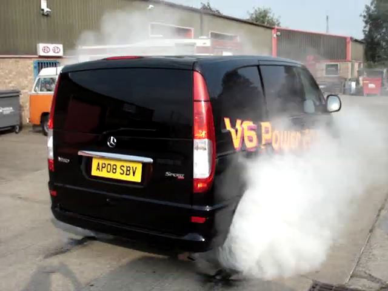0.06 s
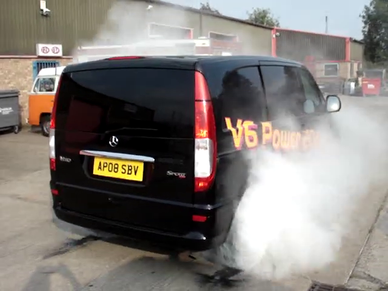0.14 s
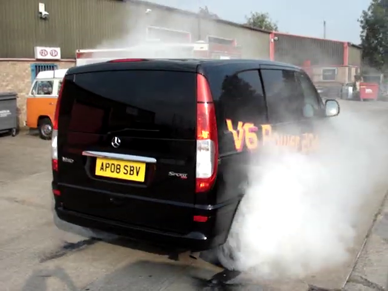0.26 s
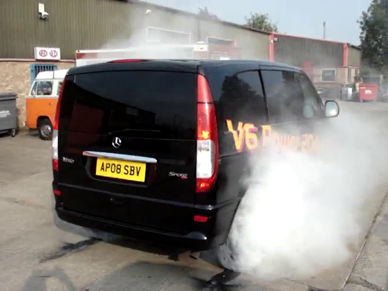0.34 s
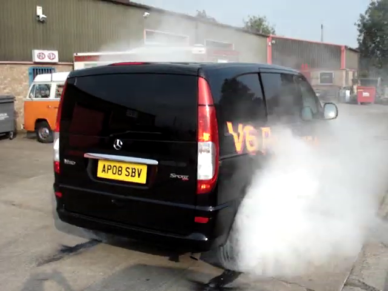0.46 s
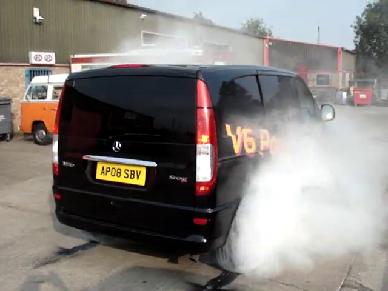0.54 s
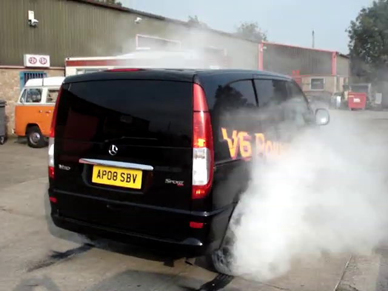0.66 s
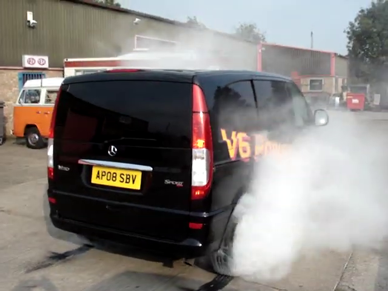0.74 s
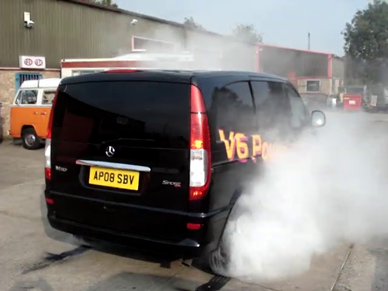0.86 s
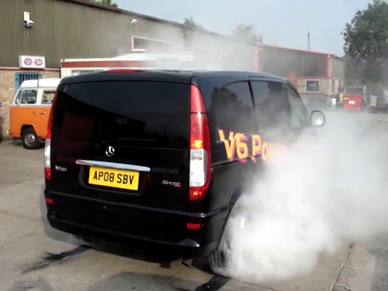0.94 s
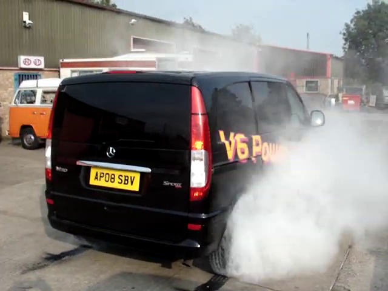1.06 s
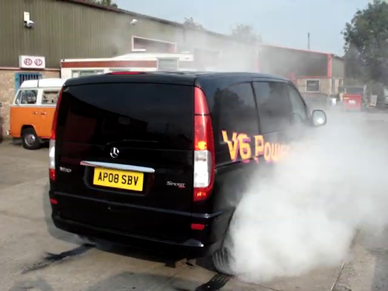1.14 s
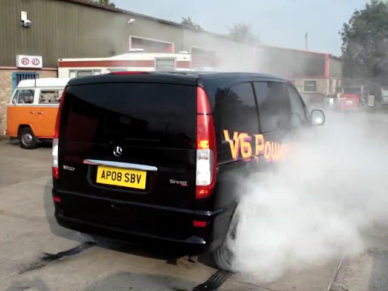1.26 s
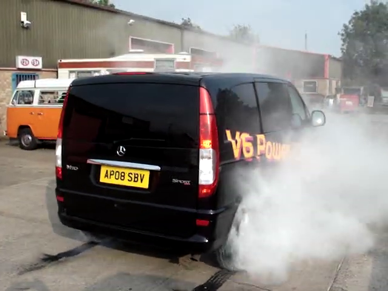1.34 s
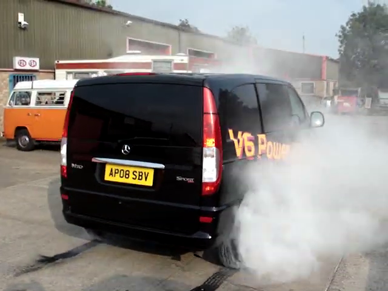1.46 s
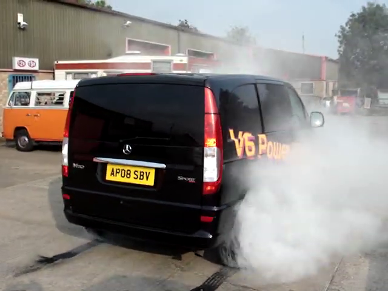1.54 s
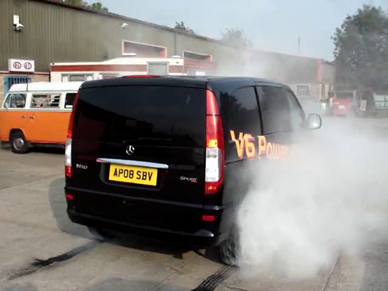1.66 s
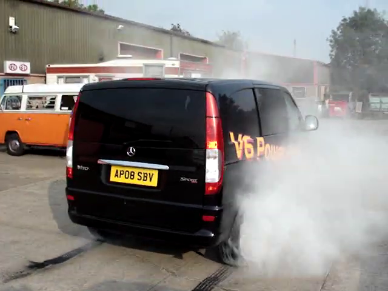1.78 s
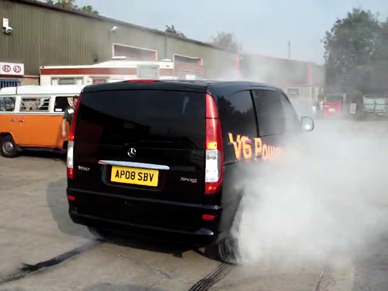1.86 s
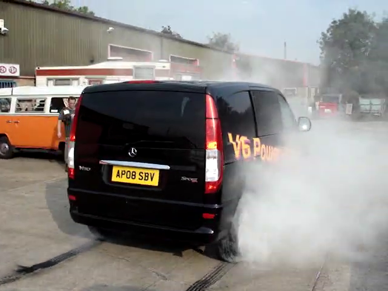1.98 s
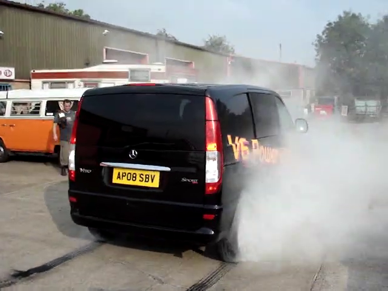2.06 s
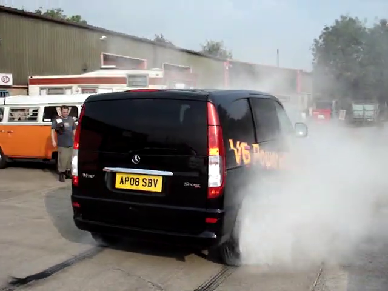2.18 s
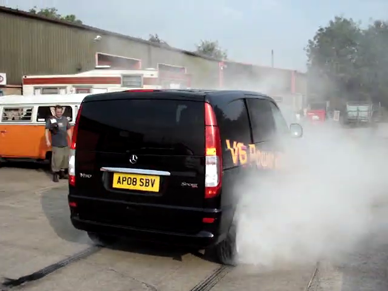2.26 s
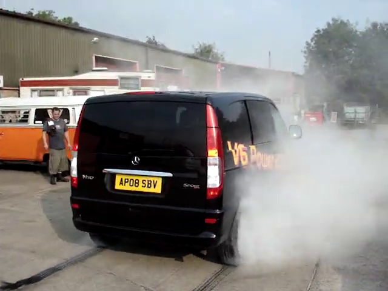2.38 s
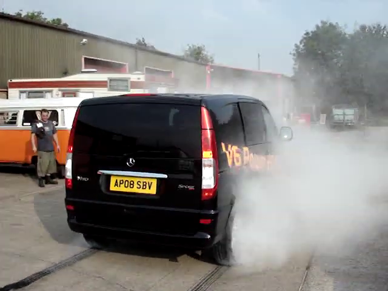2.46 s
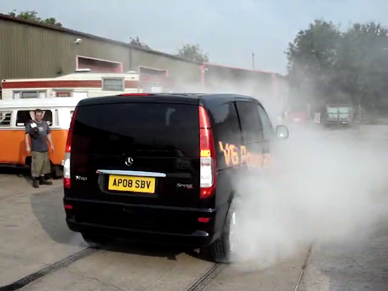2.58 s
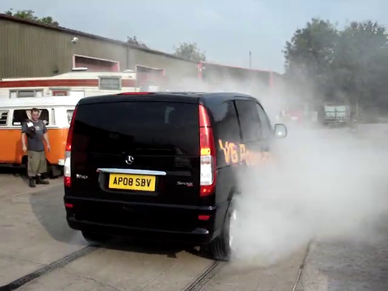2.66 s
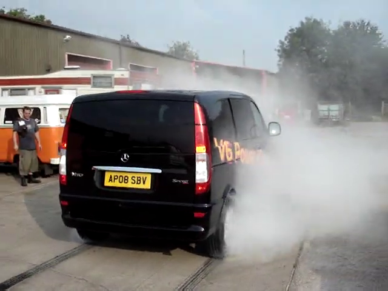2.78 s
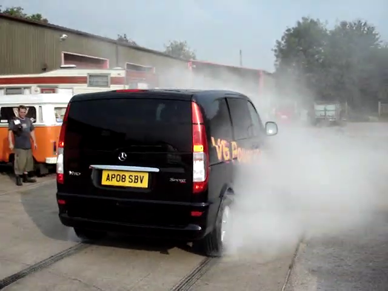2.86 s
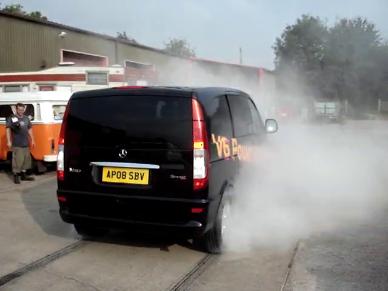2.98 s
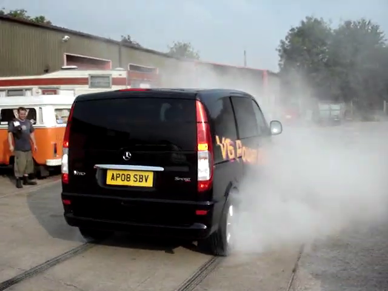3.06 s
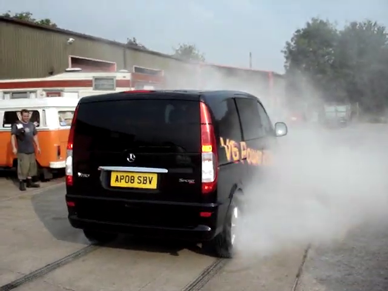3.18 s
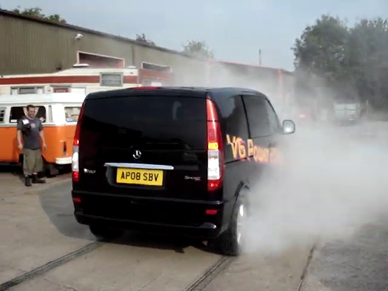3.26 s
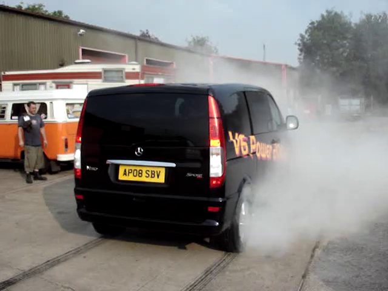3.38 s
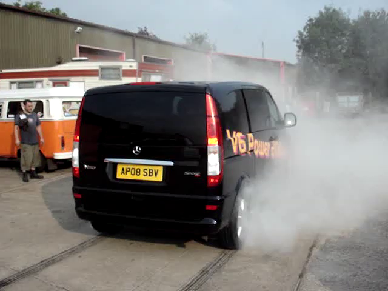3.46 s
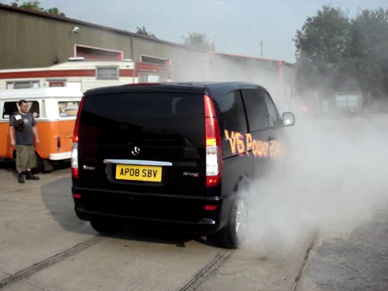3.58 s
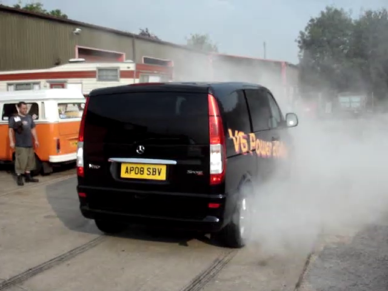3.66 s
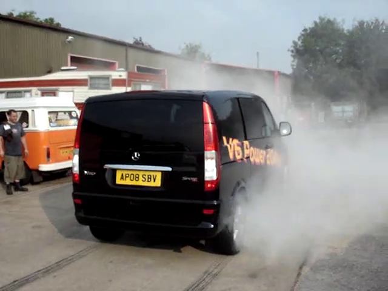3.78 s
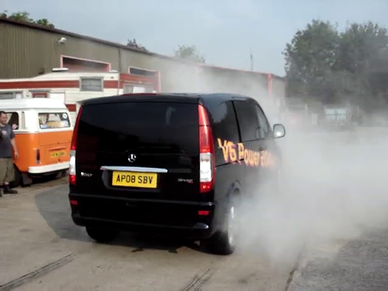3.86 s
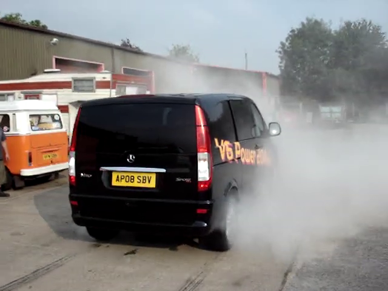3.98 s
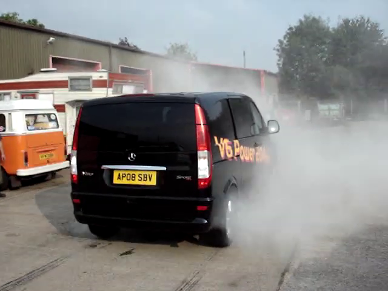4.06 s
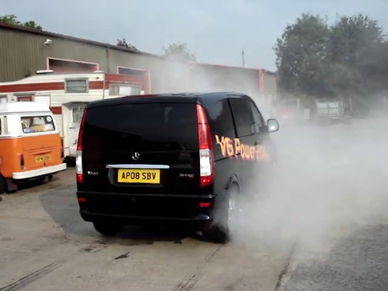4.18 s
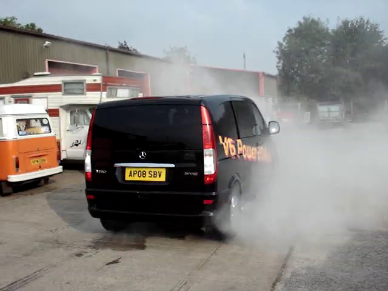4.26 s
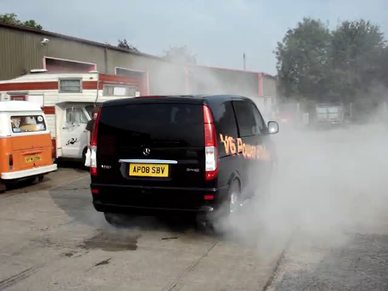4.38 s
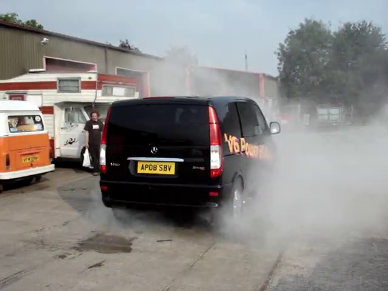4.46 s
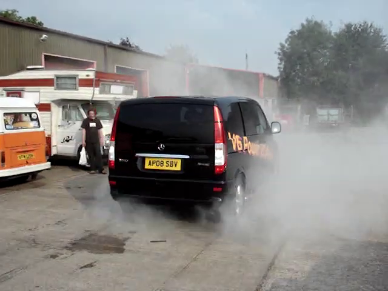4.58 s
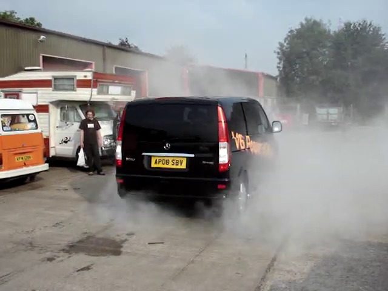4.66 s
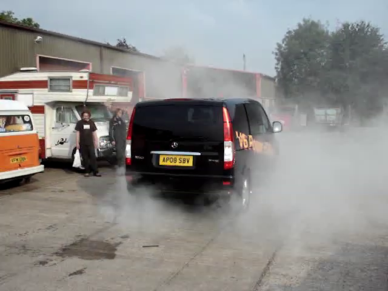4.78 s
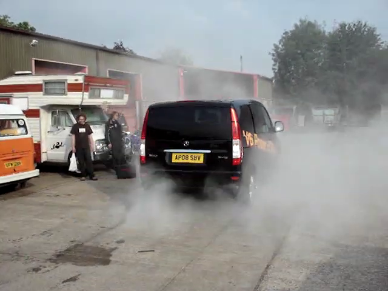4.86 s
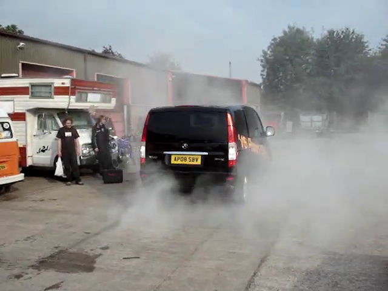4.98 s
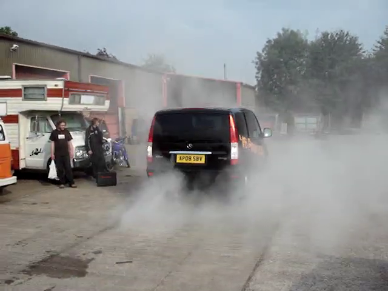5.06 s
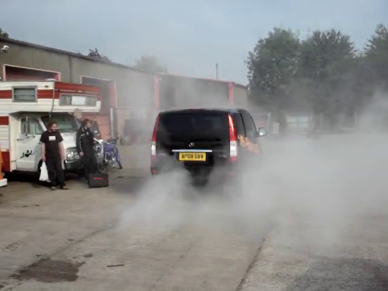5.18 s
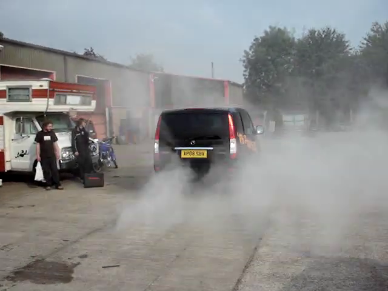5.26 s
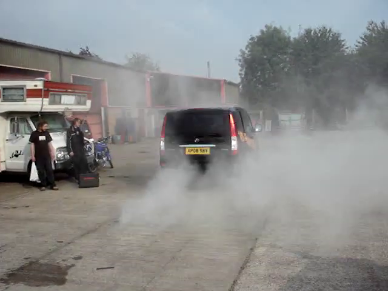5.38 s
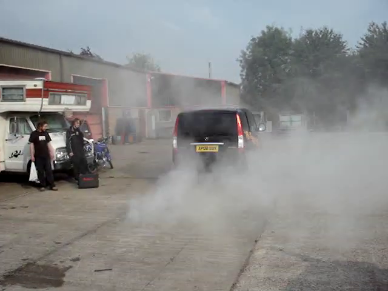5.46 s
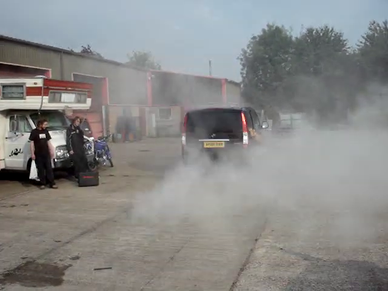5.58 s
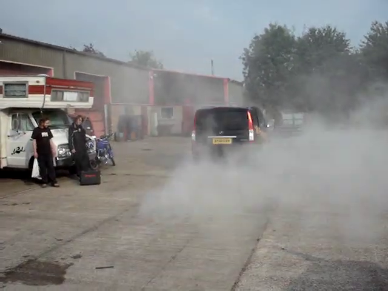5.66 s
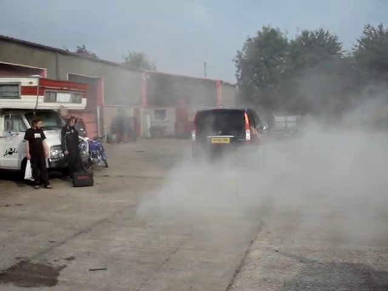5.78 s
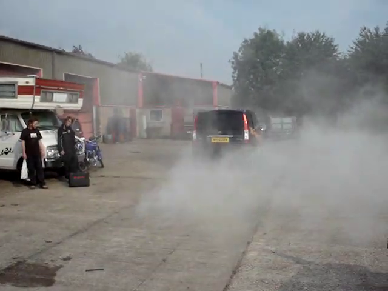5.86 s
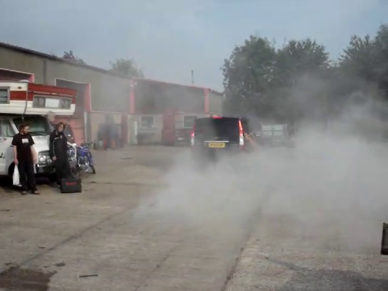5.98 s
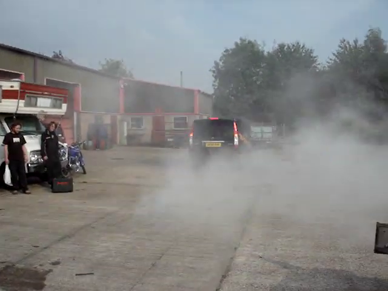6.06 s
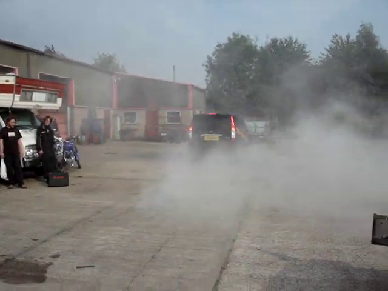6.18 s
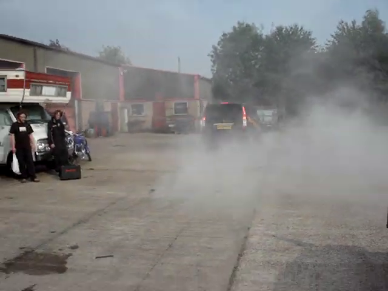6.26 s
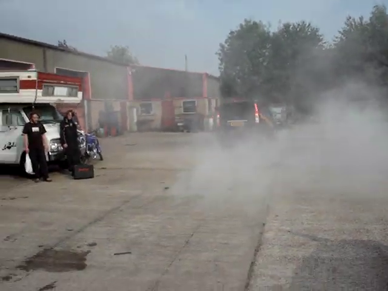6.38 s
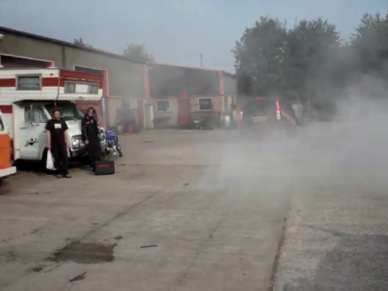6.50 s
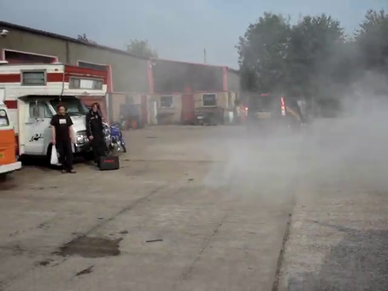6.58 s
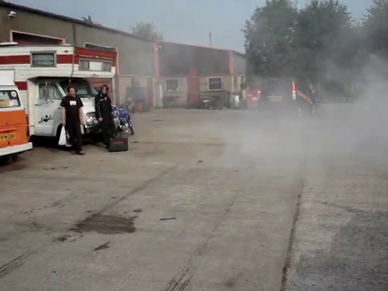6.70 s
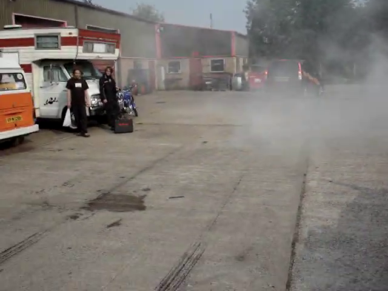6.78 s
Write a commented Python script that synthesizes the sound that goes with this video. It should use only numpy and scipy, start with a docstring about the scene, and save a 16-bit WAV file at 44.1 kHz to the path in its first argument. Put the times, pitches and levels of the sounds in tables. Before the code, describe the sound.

From the first instant a spinning tyre squeals loudly at close range, a rough, noisy band near 1.1 kHz with a wavering strand, small falters and brief gliding shrieks, especially around 1.0-1.2, 1.5 and 2.2-3.3 s. Grainy rubber scraping and bright hiss run alongside it. Underneath, a van engine is dragged steadily down in pitch until about 3.4 s. The squeal drops sharply at 3.5-3.7 s and is gone by 4. The engine then climbs with a growling, hollow intake roar, peaking near 5.4 s. Scraping continues as the tyre grips, with sharp grit bursts and hard stone ticks between 4.4 and 5.7 s, and a short low chirp at 5.1 s. From 5.5 s scraping fades, the engine coasts lower and quieter, and wind rumble rises, with strong microphone buffets around 6.2-6.35 s, continuing to the end near 6.8 s.

```python
"""A tyre squeals and hisses at once, over an engine being dragged down: a van does a burnout in a concrete yard.
Squeal is noise ringing the tread resonances plus a wavering strand; brief glides are the tread locking to a note.
Scraping is grainy noise; the engine is a sum of firing orders and a pulsed roar that rings the intake and bay.
The tyre grips, the engine pulls up again and the van drives away: grit is short noise bursts and decaying
panel tones, wind is low noise that picks up late, with short buffets."""
import sys
import numpy as np
from scipy import signal
from scipy.fft import rfft, irfft
from scipy.io import wavfile
from scipy.ndimage import uniform_filter1d

SR = 44100
rng = np.random.default_rng(int(sys.argv[2]) if len(sys.argv) > 2 else 0)


def pcm_store(signal):
    """Save signal as 16-bit PCM."""
    levels = np.round(np.clip(np.atleast_2d(signal), -1, 1) * 32767)
    wavfile.write(sys.argv[1], SR, levels.astype(np.int16).T)


N = 301158
T = np.arange(N) / SR

# squeal: (time [s], level before trim [dB], centre of the tread resonance [Hz])
SQUEAL = [(0.0, -13, 1192), (0.04, -11, 1088), (0.27, -17, 1093), (1.03, -11.5, 1115), (1.15, -13, 1055),
          (1.21, -13, 1100), (2.33, -11.5, 1092), (3.21, -12.5, 1107), (3.22, -15.5, 1136),
          (3.39, -15.5, 1128), (3.62, -26.5, 894), (3.85, -44, 957)]
# tread modes: (factor on the centre [ratio], width [Hz], relative level [dB])
TREAD_MODES = [(0.927, 98, 0.5), (1.033, 107.4, -2.5), (1.16, 238, -7)]
# tread bites and the squeal falters: (start [s], end [s], level change [dB])
BITES = [(0.165, 0.21, -4), (1.193, 1.317, -3), (1.38, 1.425, -6), (1.68, 1.731, -3.5), (2.567, 2.72, -2.5),
         (2.871, 2.95, -4), (3.011, 3.06, -7), (3.173, 3.21, -3), (3.548, 3.588, -4), (3.638, 3.72, -2)]
# tread locks into one note: (start [s], end [s], first pitch [Hz], last pitch [Hz], level [dB])
SHRIEKS = [(.52, .62, 1255, 1208, -20), (.64, 0.808, 1204, 1172, -19.5), (.97, 1.09, 1150, 1092, -13.5),
           (1.075, 1.184, 1098, 1050, -9), (1.47, 1.52, 1143, 1127, -7.5), (2.205, 2.258, 1181, 1220, -13),
           (2.49, 2.563, 1120, 1136, -7), (2.72, 2.756, 1138, 1165, -12), (2.78, 2.813, 1162, 1077, -9),
           (2.85, 2.872, 1126, 1130, -5), (2.945, 3.025, 1122, 1162, -9), (3.207, 3.268, 1147, 1150, -6),
           (3.27, 3.324, 1153, 1130, -14.5), (3.46, 3.55, 1007, 983, -25), (3.585, 3.635, 863, 835, -23.5),
           (3.715, 3.762, 905, 873, -27), (5.06, 5.147, 965, 952, -21.5), (5.155, 5.19, 978, 950, -23)]
# strand starts to break up, is gone, as the tyre begins to grip: (time [s])
GRIP_S = [3.3, 3.5]
# leading strand: share, slow and fast rms pitch spread [ratio]
STRAND_SHARE, STRAND_WANDER, STRAND_JITTER = 1, .02, .018

# rubber scraping on concrete, below the treble: (time [s], level before trim [dB])
SCRUB_DB = [(0.03, -18), (0.22, -19), (0.29, -17), (1.2, -20), (2.17, -18.5), (2.47, -21), (2.53, -24),
            (2.59, -21.5), (3.48, -21), (3.61, -33.5), (4.78, -20), (4.8, -17.5), (4.97, -18), (5.1, -16),
            (5.16, -18), (5.71, -22), (5.84, -29.5), (6.83, -35)]
# treble of the scraping: (time [s], level before trim [dB])
TREBLE_DB = [(0.05, -39), (0.46, -32.5), (1.48, -38), (1.76, -34.5), (2.4, -38.5), (2.42, -39.5),
             (3.45, -41.5), (3.58, -49.5), (4.96, -37.5), (5.61, -45.5), (5.84, -48.5), (6.8, -54)]
# scraping spectrum: (frequency [Hz], relative level [dB])
SCRUB_COLOUR = [(100, -42), (500, -10), (780, -7), (1000, -1), (1400, -2.5), (1750, -4.5), (2300, -2),
                (2900, -0.5), (3500, -2.5), (4500, -7), (5500, -10.5), (6800, -18), (8500, -20.5),
                (10000, -29)]

# engine speed: (time [s], firing rate of the six cylinders [Hz])
FIRING_HZ = [(0, 141.4), (.7, 115.8), (1.5, 90.47), (2.6, 71.7), (3.4, 54.7), (3.7, 59.95), (4, 82.17),
             (4.2, 93.66), (4.95, 129), (5.4, 143.6), (5.9, 121.4), (6.3, 112.1), (6.83, 96.45)]
# engine load: times when the drag eases, the van pulls, the throttle lifts, the van coasts (time [s])
LOAD_S = [3.5, 3.9, 5.3, 5.7]
# exhaust orders: (multiple of firing rate, relative level dragged [dB], pulling [dB], coasting [dB])
ORDERS = [(1, -2, 5, -2), (2, -1, 2.5, 6.5), (3, -20, 0, -8), (4, -14, 12, 2.5), (5, 3.5, 9, 5.5),
          (6, 3, 4, 0), (7, -19, 2, -5)]
# order passing a van resonance: (start [s], end [s], multiple of firing rate, level [dB])
RESONANT_ORDERS = [(-.3, .8, 1, -40), (1.55, 1.95, 2, -45), (2.05, 2.303, 1, -44), (3.53, 3.72, 2, -37.5),
                   (3.847, 4.402, 2, -39), (4.593, 5.295, 1, -31), (4.87, 5.1, 12, -24),
                   (5.05, 5.6, 3, -27.5), (5.5, 6.4, 6, -33), (5.6, 6.047, 2, -41), (6.25, 6.65, 2, -34)]
# engine roar: (time [s], level before load trim [dB])
ROAR_DB = [(0.15, -30.5), (0.37, -23), (1.17, -33), (1.92, -29.5), (2.64, -39), (3.46, -32), (4.43, -20),
           (5.41, -24), (5.45, -19), (5.9, -26.5), (6.83, -28.5)]
# roar spectrum: (frequency [Hz], relative level [dB])
ROAR_COLOUR = [(40, -19.5), (100, -20.5), (220, -7.5), (300, -14.5), (400, -9), (560, -6.5), (760, -6.5),
               (900, -8.5), (1100, -10), (1400, -9.5), (1900, -17.5), (3300, -24.5), (6000, -32.5),
               (10000, -58.5)]
# intake resonances: (frequency [Hz], width [Hz], relative level [dB])
INTAKE_MODES = [(485, 93, -3), (587.4, 160, -2.5)]
# intake boom on each push of the throttle: (start [s], end [s], level added to idle gain [dB])
THROTTLE = [(-.1, 0.903, -38), (3.725, 4.955, -26.5), (4.898, 5.7, -32.5)]
# engine bay resonances: (frequency [Hz], width [Hz], relative level [dB])
BAY_MODES = [(403, 120, -4), (873, 92, -2), (1374, 190, -9.5), (3410, 310, -9), (4690, 200, -15.5)]
# ringing of the bay by load: (dragged [dB], pulling [dB], coasting [dB])
BAY_DB = [-45, -29.5, -38.5]
# order reference level at 100 firings/s, and its growth with speed
EXHAUST_DB, EXHAUST_DB_PER_OCTAVE = -44, 9.5
INTAKE_IDLE_DB = -42.5

# wind spectrum: (frequency [Hz], relative level [dB])
WIND_COLOUR = [(15, -1.5), (40, -5.5), (80, 0.5), (130, 0), (210, -3.5), (350, -12), (800, -42.5),
               (3000, -55.5)]
# wind buffets on the microphone: (time [s], level before trim [dB], length [s])
BUFFETS = [(0.789, -37, 0.09), (.88, -43, 0.16), (1.418, -42, 0.066), (1.66, -40, 0.16), (1.851, -51, 0.31),
           (3.199, -47, 0.083), (4.799, -43, 0.072), (5.15, -40, 0.08), (5.62, -31, 0.17),
           (5.861, -30, 0.063), (6.144, -35, 0.12), (6.24, -23.5, 0.073), (6.339, -21.5, 0.024),
           (6.499, -33, 0.058), (6.754, -32, 0.099)]
# wind level before and after it picks up, and rms unsteadiness
CALM_DB, BREEZE_DB, GUSTY_DB = -48.5, -33.5, 2
BREEZE_S, BREEZE_RISE_S = 5.43, 0.15

# harsh scrapes and grit sprays: (time [s], level before trim [dB], centre [Hz], length [s])
SPRAYS = [(0.292, -16.5, 3180, 0.092), (0.53, -17, 2530, 0.045), (1.545, -13, 2200, 0.024),
          (2.188, -15.5, 3209, 0.043), (3.261, -15, 3903, 0.012), (3.408, -16.5, 3120, 0.036),
          (3.922, -22.5, 3700, 0.011), (4.213, -17.5, 3450, 0.016), (4.448, -12.5, 3852, 0.012),
          (4.787, -11, 3203, 0.012), (4.819, -11, 1170, 0.034), (5.106, -8, 2850, 0.018),
          (5.16, -8.5, 2630, 0.023), (5.164, -9.5, 1020, 0.024), (5.349, -12, 1190, 0.013),
          (5.277, -10, 3360, 0.015), (5.41, -14, 3140, 0.018), (5.566, -17, 2998, 0.017),
          (5.643, -15, 2200, 0.016), (6.236, -24, 2800, .012)]
# stones flicked against the body: (time [s], peak [dB])
STONES = [(4.822, 0), (4.827, 2), (4.91, -6), (5.358, 0), (5.653, -4)]
# ringing of the struck panel: (frequency [Hz])
KNOCK_HZ = [1151, 2548, 4034]

EDGE_HZ = 10150  # band limit


def amp(db):
    """Decibels to gain."""
    return 10 ** (np.asarray(db) / 20)


def unit(x):
    """Scales to an rms of one."""
    return x / np.sqrt(np.mean(x ** 2) + 1e-20)


def curve(rows, axis=1):
    """One table column, joined by straight lines in time."""
    rows = np.array(rows, float)
    return np.interp(T, rows[:, 0], rows[:, axis])


def add(mix, start_s, sound):
    """Mixes a sound in at a time."""
    part = mix[max(round(start_s * SR), 0):][:len(sound)]
    part += sound[:len(part)]


def colour(x, points):
    """Filters by a short spectrum, interpolated over log frequency; rms one."""
    hz, db = np.transpose(points)
    bin_hz = np.fft.rfftfreq(N, 1 / SR)
    gain = amp(np.interp(np.log(bin_hz + 1), np.log(hz), db))
    return unit(irfft(rfft(x) * gain, N))


def drift(hz):
    """Slow chance: noise with a Gaussian low-pass, rms one."""
    lowpass = np.exp(-(np.fft.rfftfreq(N, 1 / SR) / hz) ** 2)
    return unit(irfft(rfft(rng.standard_normal(N)) * lowpass, N))


def resonate(x, hz, width_hz):
    """Double-pole resonance that can follow a moving frequency; rms one."""
    turn = np.exp(2j * np.pi * np.cumsum(hz * np.ones(len(x))) / SR)
    r = np.exp(-np.pi * abs(width_hz) / SR)
    # shift down to 0 Hz, low-pass, shift back
    ringing = signal.lfilter([1], [1, -2 * r, r * r], x / turn)
    return unit((turn * ringing).real)


def patchy(x, depth_db, size):
    """Brief, narrow swells and dips scattered over time and frequency."""
    z = signal.stft(x, nperseg=512, noverlap=384)[2]
    patches = uniform_filter1d(rng.standard_normal(z.shape), size, axis=0)
    patches = unit(uniform_filter1d(patches, size, axis=1))
    return unit(signal.istft(z * amp(depth_db * patches), nperseg=512, noverlap=384)[1][:N])


def swell(start_s, end_s, taper):
    """Rises, holds and falls between two times; taper is the share spent rising and falling."""
    edge = np.minimum(T - start_s, end_s - T) / (.5 * taper * (end_s - start_s))
    return np.sin(np.pi / 2 * np.clip(edge, 0, 1)) ** 2


def by_load(dragged, pulling, coasting):
    """A value that follows the engine's load."""
    return np.interp(T, LOAD_S, [dragged, pulling, pulling, coasting])


def squeal():
    """Tread blocks stick and slip out of step around one wavering strand; friction caps their swing."""
    centre_hz = curve(SQUEAL, axis=2)
    blocks = unit(sum(amp(db) * resonate(rng.standard_normal(N), centre_hz * factor, width_hz)
                      for factor, width_hz, db in TREAD_MODES))
    pitch_spread = 1 + STRAND_WANDER * drift(hz=10) + STRAND_JITTER * drift(hz=99.6)
    strand_hz = centre_hz * 1.025 * pitch_spread
    strand = np.sin(2 * np.pi * np.cumsum(strand_hz) / SR)
    blocks = blocks + STRAND_SHARE * np.interp(T, GRIP_S, [1, 0]) * strand
    blocks = blocks * amp(1.1 * drift(hz=90))  # the contact patch chatters
    swing = np.sqrt(abs(uniform_filter1d(blocks ** 2, size=2200)) + 1e-9)
    capped = unit(blocks / swing ** .7)
    sliding = np.interp(T, [3.75, 4.1], [1, 0])
    bite_db = sum(db * swell(start, end, taper=0.57) for start, end, db in BITES)
    return amp(curve(SQUEAL) + bite_db - 0.85) * sliding * capped


def tyre():
    """Blocks falling into step give a nearly pure gliding note, and the rough squeal yields a little."""
    notes, locked = np.zeros(N), np.zeros(N)
    waver = 1 + 0.0063 * drift(hz=60)
    for start, end, first_hz, last_hz, db in SHRIEKS:
        count = max(round((end - start) * SR), 2)
        hz = np.linspace(first_hz, last_hz, count) * waver[round(start * SR):][:count]
        phase = 2 * np.pi * np.cumsum(hz) / SR
        shape = signal.windows.tukey(count, .35)
        tone = np.sin(phase) + amp(-23.5) * np.sin(2 * phase)
        add(notes, start, amp(db) * np.sqrt(2) * shape * tone)
        add(locked, start, shape * amp(db))
    return notes + squeal() * np.clip(1 - 0.72 * locked, .35, 1)


def scrub():
    """Rubber tearing over concrete: fluttering noise full of tiny random grains."""
    struck = rng.random(N) < 900 / SR  # 900 grains/s on average
    grain_db = 2.3 * np.minimum(rng.exponential(1, N), 4)
    grains = struck * rng.choice([-1, 1], N) * amp(grain_db)
    flutter_db = 0.33 * drift(hz=70) + .5 * drift(hz=36)
    rasp = (rng.standard_normal(N) + .5 * unit(grains)) * amp(flutter_db)
    hiss = colour(patchy(rasp, depth_db=1.22, size=7), SCRUB_COLOUR)
    treble = signal.sosfiltfilt(signal.butter(2, 5600, "high", fs=SR, output="sos"), hiss)
    body = amp(curve(SCRUB_DB) + 1.5) * (hiss - treble)
    return body + amp(curve(TREBLE_DB) + 2.5 + .6 * drift(hz=25)) * unit(treble)


def engine():
    """Exhaust orders, and a roar of gas noise that pulses with each firing and rings the intake and bay."""
    rate_hz = curve(FIRING_HZ)
    firings = np.cumsum(rate_hz * (1 + 0.0081 * drift(hz=14.1))) / SR
    exhaust_db = EXHAUST_DB + EXHAUST_DB_PER_OCTAVE * np.log2(rate_hz / 100)
    note = np.zeros(N)
    for k, dragged, pulling, coasting in ORDERS:
        phase = 2 * np.pi * (k * firings + rng.random()) + 0.93 * drift(hz=25)
        order_db = exhaust_db + by_load(dragged, pulling, coasting) + 2 * drift(hz=4.9)
        note += amp(order_db) * np.sin(phase)
    whine = np.zeros(N)
    for start, end, k, db in RESONANT_ORDERS:
        phase = 2 * np.pi * k * firings + 0.38 * drift(hz=25)
        whine += amp(db) * swell(start, end, taper=0.67) * np.sin(phase)
    # the six cylinders differ, so a comb of weak lines repeats every sixth firing
    cycle = np.linspace(0, 1, 2048)
    comb = sum(np.cos(2 * np.pi * (k * cycle + rng.random())) for k in range(8, 130))
    clatter = unit(np.interp(firings / 6 % 1, cycle, comb))
    pulsed = unit(rng.standard_normal(N) * (1 + .5 * np.cos(2 * np.pi * firings)))
    gas = unit(pulsed + .22 * clatter)
    boom, bay = (unit(sum(amp(db) * resonate(gas, hz, width_hz) for hz, width_hz, db in modes))
                 for modes in (INTAKE_MODES, BAY_MODES))
    throttle = amp(INTAKE_IDLE_DB) + sum(amp(db) * swell(start, end, taper=0.61)
                                         for start, end, db in THROTTLE)
    roar = amp(curve(ROAR_DB) + by_load(-0.71, -0.12, 2.57)) * colour(gas, ROAR_COLOUR)
    roar = roar + throttle * boom + amp(by_load(*BAY_DB)) * bay
    return note + roar + whine * amp(3.1 * drift(hz=30))


def wind():
    """Low rumble of air on the microphone that picks up as the van leaves, with short buffets."""
    breeze = np.clip((T - BREEZE_S) / BREEZE_RISE_S, 0, 1)
    force = amp(CALM_DB + (BREEZE_DB - CALM_DB) * breeze + GUSTY_DB * drift(hz=4.8))
    for start, db, length_s in BUFFETS:
        count = round(abs(length_s) * SR) + 2
        add(force, start, amp(db + 2) * signal.windows.tukey(count, .7))
    rumble = colour(rng.standard_normal(N), WIND_COLOUR)
    # level the noise so that force alone sets its loudness
    return force * rumble / np.sqrt(abs(uniform_filter1d(rumble ** 2, size=2200)) + 1e-9)


def grit():
    """Gravel as short resonant bursts of uneven noise; stones as fast-decaying panel tones."""
    out = np.zeros(N)
    for start, db, hz, length_s in SPRAYS:
        count = round(abs(length_s) * SR) + 2
        gravel = rng.standard_normal(count) * amp(4.6 * rng.standard_normal(count))
        spray = resonate(gravel, hz, 0.5 * hz) * signal.windows.tukey(count, .6)
        add(out, start, amp(db - 3.5) * spray)
    t = T[:SR // 50]
    snap = sum(np.sin(2 * np.pi * hz * t) for hz in KNOCK_HZ) * np.exp(-t / .0008)
    for start, db in STONES:
        add(out, start, amp(db) * snap / abs(snap).max())
    return out


def scene():
    """Tyre, engine, wind and grit summed to one channel."""
    return (tyre() + scrub() + engine() + wind() + grit())[None]


def record(dry):
    """A quick limiter holds down the loudest notes, the input rounds off stray peaks; then the band limit."""
    power_db = 10 * np.log10(abs(uniform_filter1d(dry[0] ** 2, size=180)) + 1e-12)
    recovery_db = T * 120  # 120 dB/s
    envelope_db = np.maximum.accumulate(power_db + recovery_db) - recovery_db
    over_db = np.maximum(envelope_db + 7.5, 0)  # threshold -7.5 dB
    held = dry / amp(uniform_filter1d(over_db, size=90))
    held = held / (1 + (held / .92) ** 8) ** (1 / 8)
    lowpass = signal.firwin(1023, EDGE_HZ, window=("kaiser", 9), fs=SR)
    return signal.oaconvolve(held, lowpass[None], "same")


dry = scene()
out = record(dry)
pcm_store(out)
```